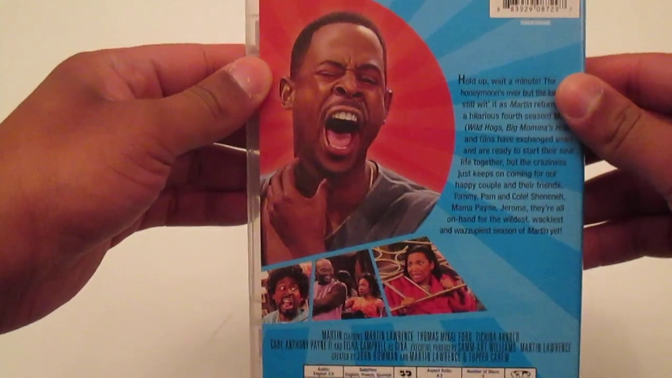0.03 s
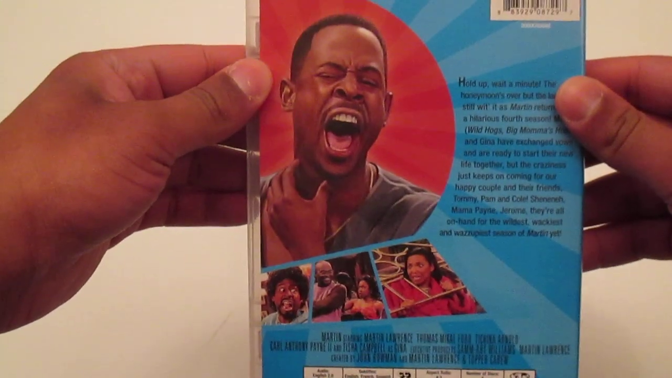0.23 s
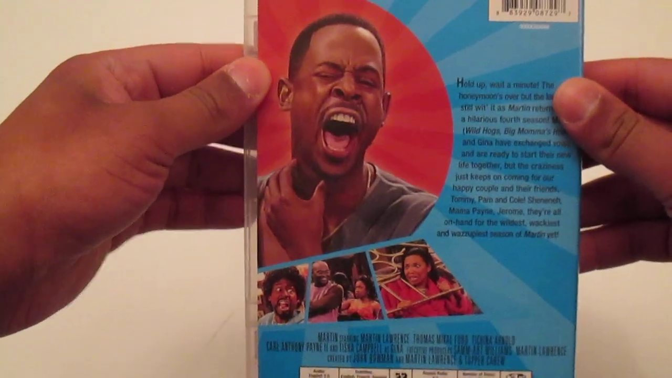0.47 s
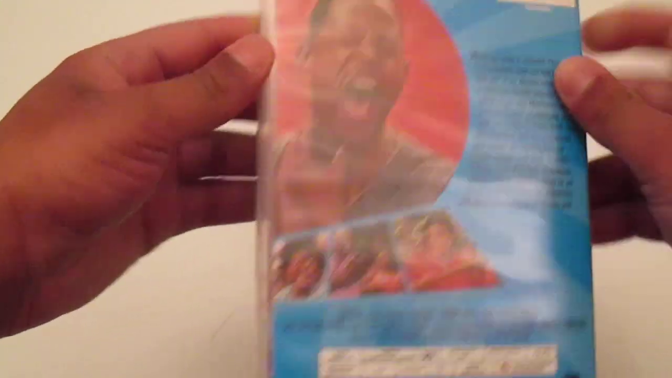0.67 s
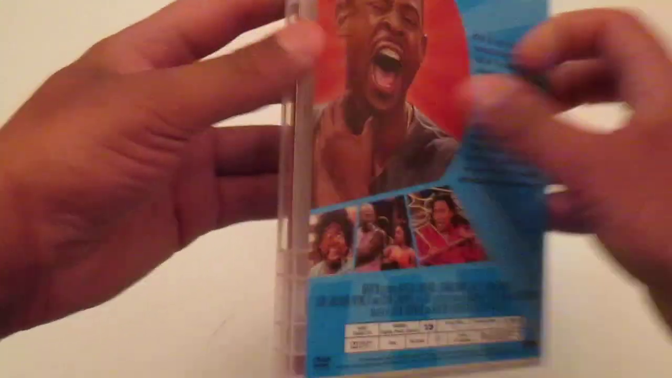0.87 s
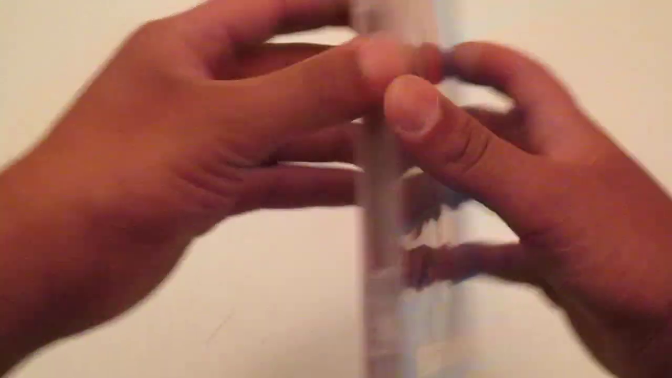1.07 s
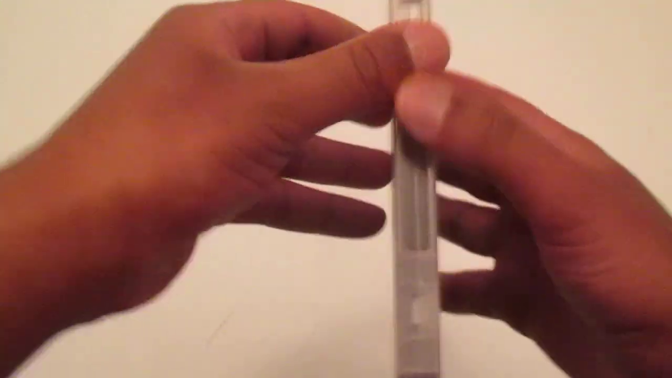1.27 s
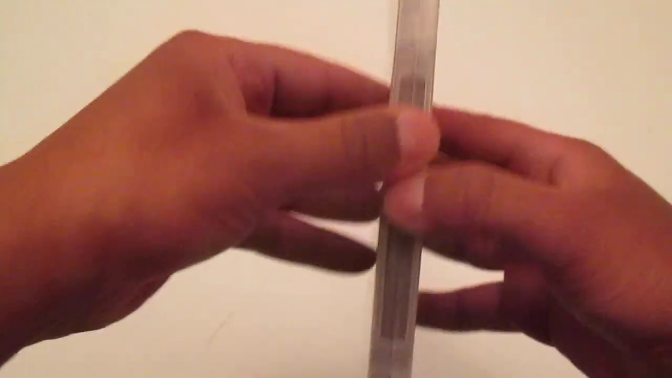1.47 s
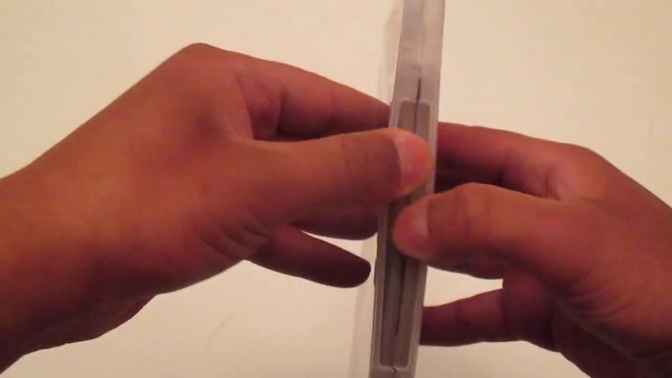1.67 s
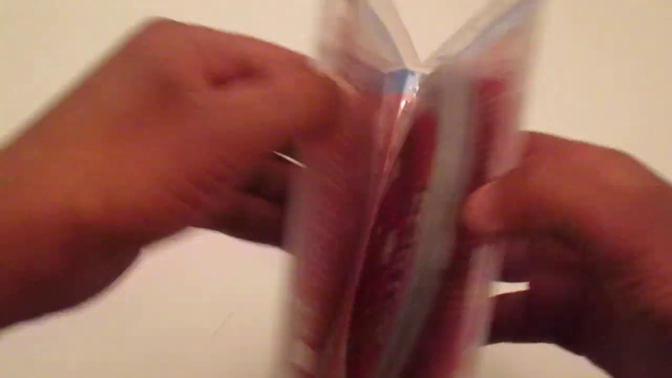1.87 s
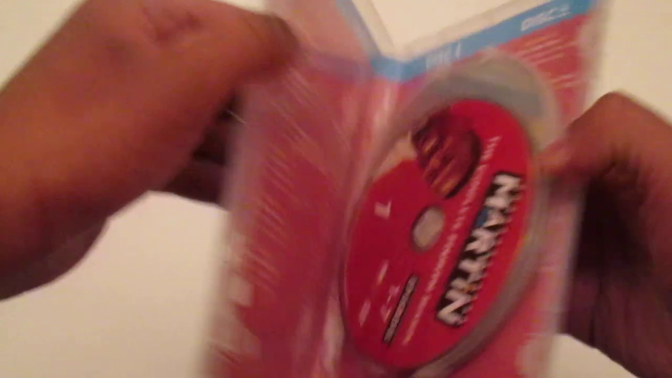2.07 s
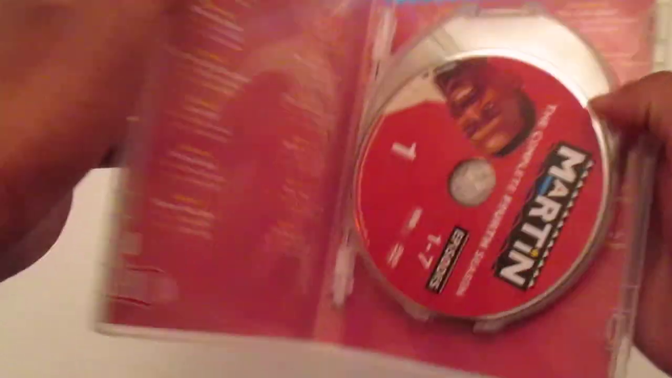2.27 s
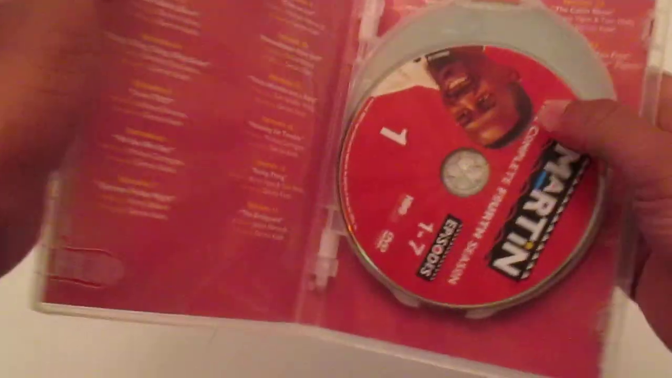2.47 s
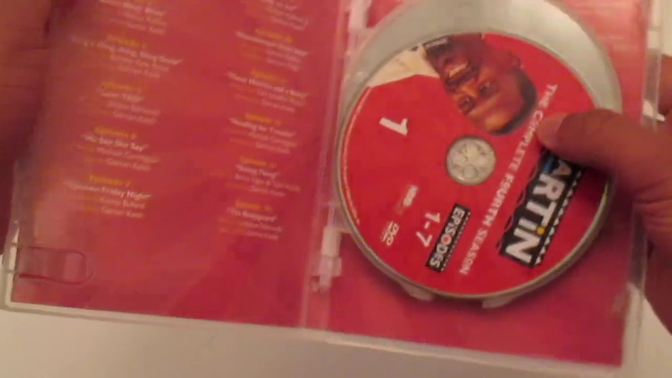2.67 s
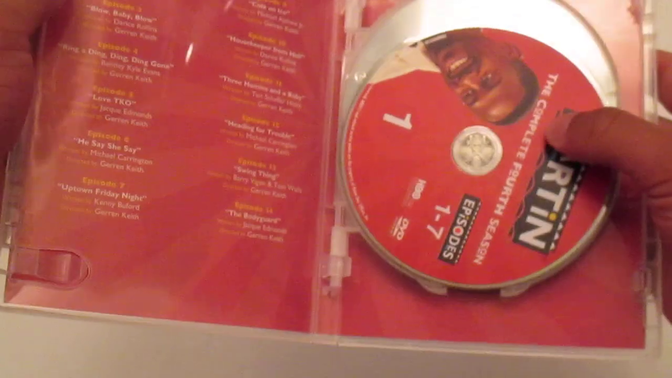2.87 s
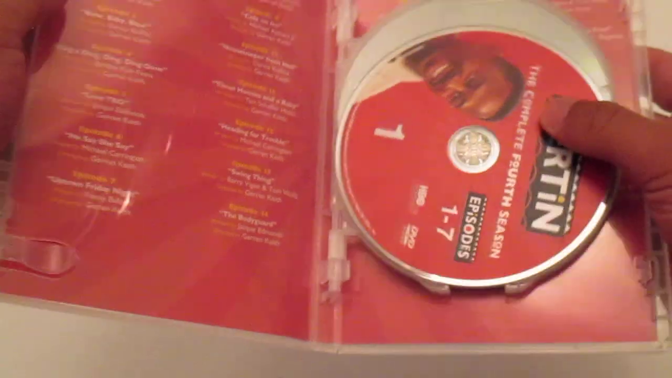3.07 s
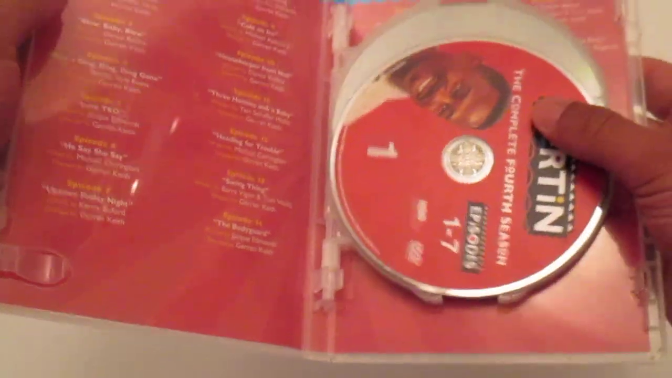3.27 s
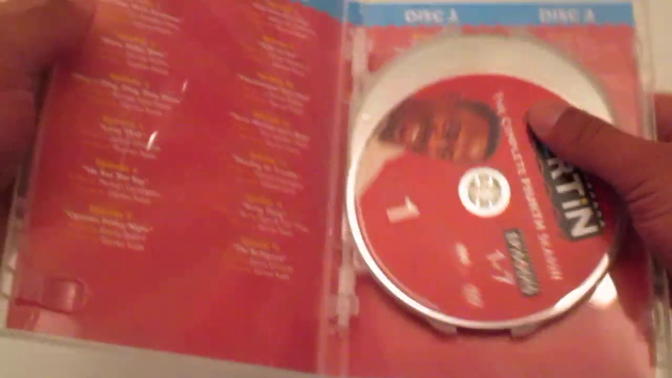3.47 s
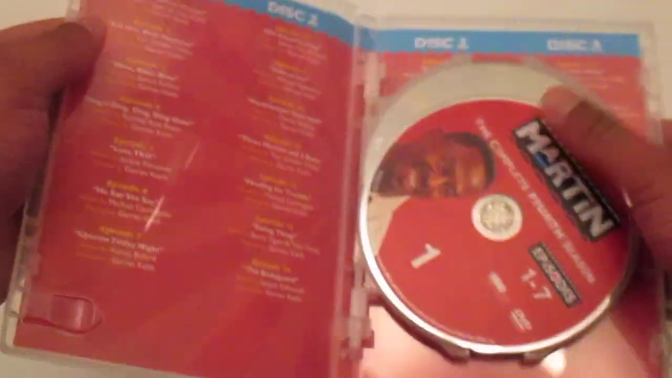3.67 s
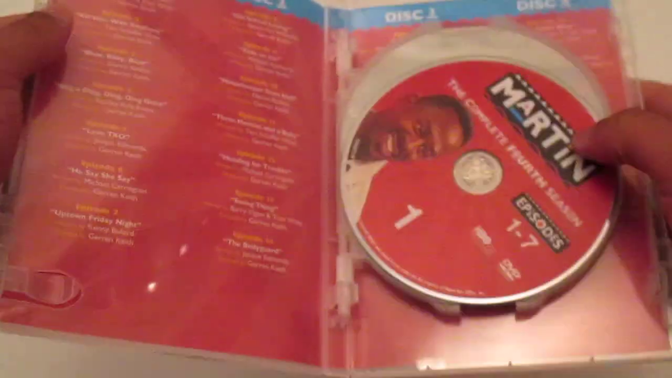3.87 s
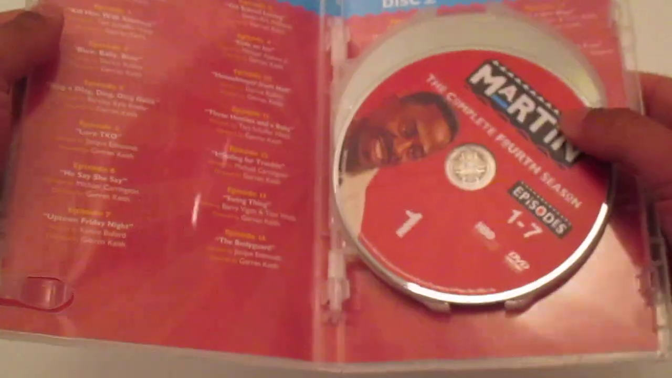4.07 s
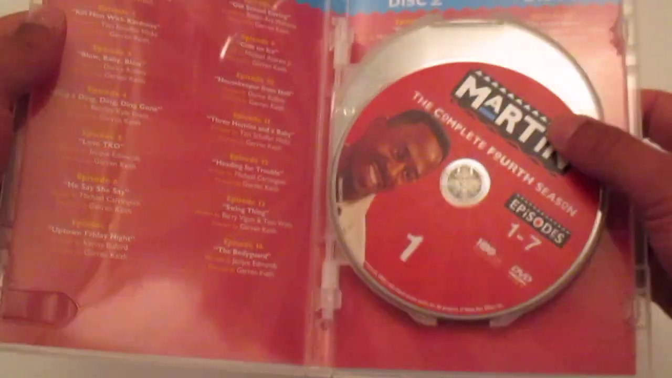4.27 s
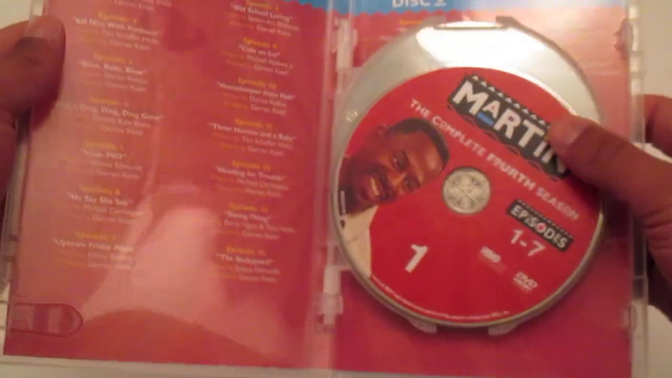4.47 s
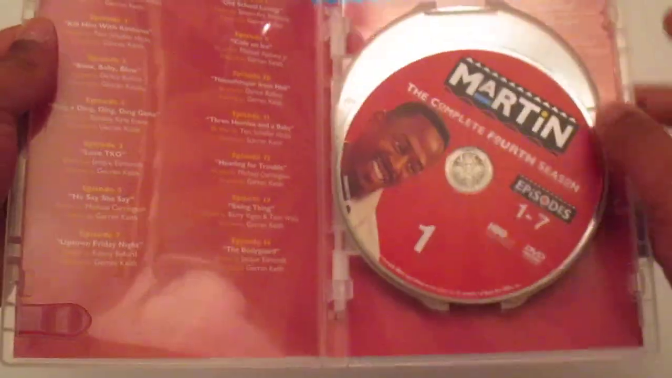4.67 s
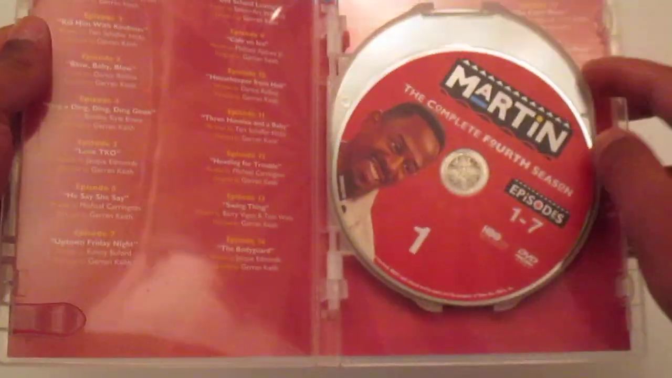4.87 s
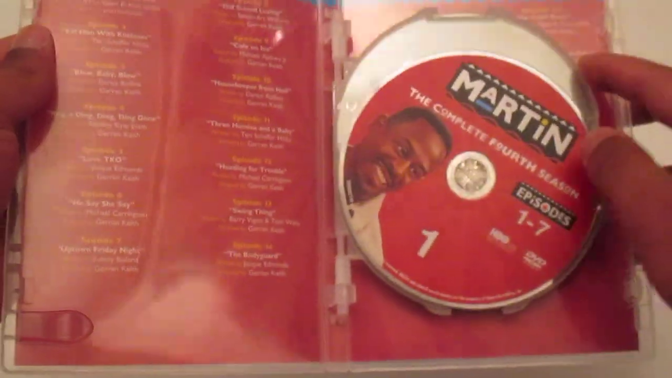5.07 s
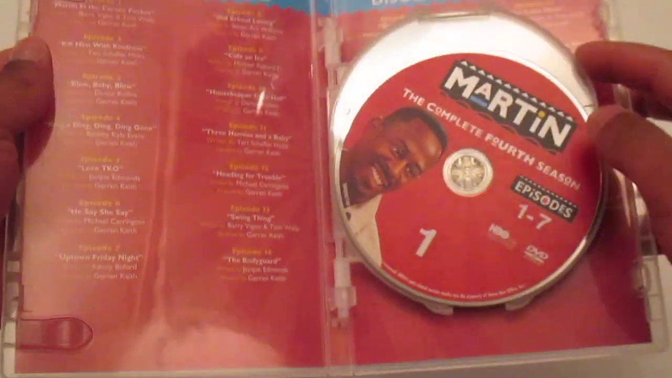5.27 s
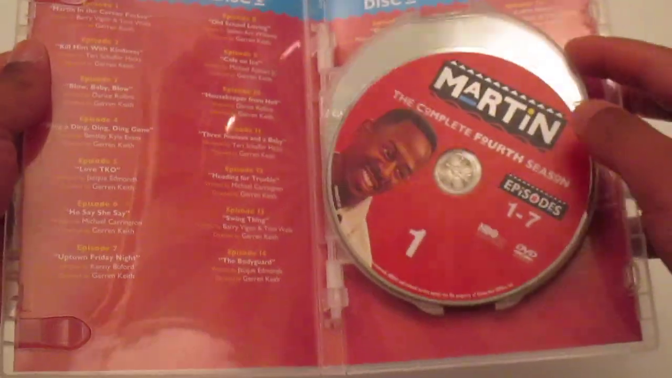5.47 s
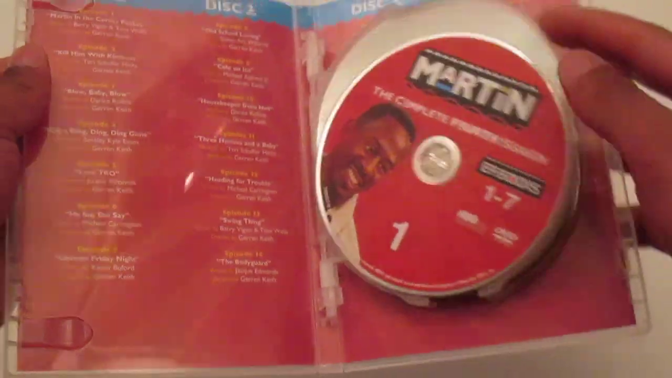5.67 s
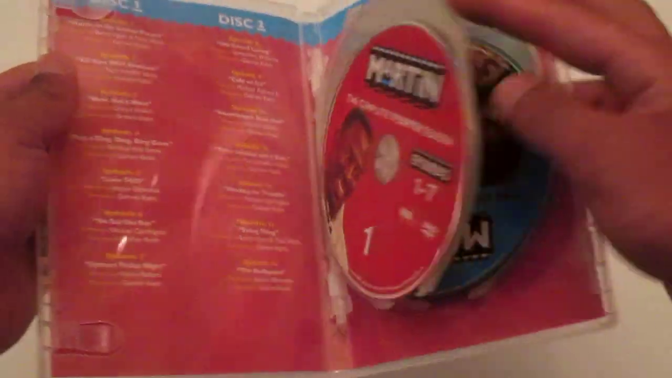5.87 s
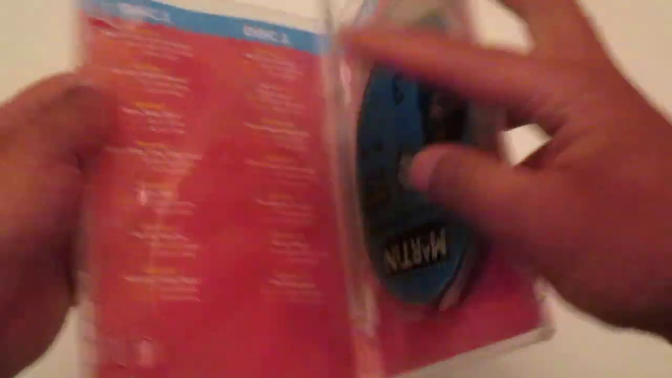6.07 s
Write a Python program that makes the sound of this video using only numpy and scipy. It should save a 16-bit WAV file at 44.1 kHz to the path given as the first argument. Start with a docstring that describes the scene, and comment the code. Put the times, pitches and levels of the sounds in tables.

```python
"""A small room with a humming fan: a plastic disc case is handled close to the microphone.
Fingers tap and rub the shell, two latches snap open and the hinge cracks: blows and slips that ring plastic modes.
A thumb pushes the disc round on its hub with a stick-slip hiss; the inner tray pops free, scrapes and clacks.
The room adds near reflections and a short tail; loud snaps duck the recorder's gain and overload it."""
import sys
import numpy as np
from scipy import signal
from scipy.fft import rfft, irfft
from scipy.io import wavfile

SR = 44100
rng = np.random.default_rng(int(sys.argv[2]) if len(sys.argv) > 2 else 0)


def store_wav(level_fs):
    """Save 16-bit WAV to argv[1]."""
    pcm = np.round(np.clip(np.atleast_2d(level_fs), -1, 1) * 32767)
    wavfile.write(sys.argv[1], SR, pcm.T.astype(np.int16))


N = 270774
TIME = np.arange(N) / SR   # seconds

# Spectrum of the room air around the microphone. Each row: frequency in Hz, relative density in dB per Hz.
AIR_SPECTRUM = [(20, -1), (50, -1.5), (75, -6), (120, -2.5), (190, -10.5), (300, -9), (500, -13.5),
                (850, -14.5), (1600, -20), (3200, -24.5), (5000, -29), (8000, -34), (11000, -42),
                (16000, -46)]
AIR_DB = -54.5
# Hum of the fan in the room. Each row: frequency in Hz, relative level in dB.
FAN_HUM = [(52.5, -57.5), (102.3, -60.5), (156.1, -66)]
# Swells of the fan's motor tone. Each row: start in seconds, length in seconds, level in dB.
MOTOR_SWELLS = [(3.1, 0.96, -64), (5.15, 0.55, -66.5)]
MOTOR_HZ, MOTOR_DB = 232, -65.5
SWELL_ATTACK_S, SWELL_RELEASE_DB_PER_S = 0.43, 72
# A thin electronic whine with a trembling pitch, and a faint whistle that comes and goes.
WHINE_HZ, WHINE_DB = 11800, -80.5
WHISTLE_HZ, WHISTLE_MEDIAN_DB = 4800, -82.5

# Rumble of the shell under the moving hands.
RUMBLE_START_S, RUMBLE_ATTACK_S, RUMBLE_DB, RUMBLE_TOP_HZ = .4, .8, -60.5, 166

# Fingertips and nails knocking on the shell.
# Each row: start in seconds, relative level in dB, tilt in dB per octave, boom in dB, contact corner in Hz.
FINGER_TAPS = [(0.582, -59.5, 5.5, 1, 14000), (0.607, -51, -.5, 6, 7500), (0.644, -48.5, 3, 9, 14000),
               (0.653, -37, 0.6, -3.5, 5600), (0.789, -47, -2, 2, 14000), (0.852, -39.5, 2.5, -3, 3900),
               (0.96, -47, 5.5, -13, 6030), (1.006, -44.5, 1, 4, 7500), (1.062, -51.5, -0.5, 3.5, 5000),
               (1.09, -41, 2.5, 2, 6500), (1.175, -46.5, -1.5, 1, 7000), (1.216, -47, -0.5, 4.5, 6000),
               (1.316, -45, 0.5, 6, 5800), (2.233, -53.5, -1.5, 0, 4010), (2.424, -52.5, 0, -6, 4000),
               (3.879, -47.5, 0.5, -8, 3600), (4.465, -41.5, -3.5, -9, 3000), (4.533, -48.5, 0, -7, 4500),
               (5.65, -54, -1, 1, 3500), (5.787, -54.5, -4.5, -2, 4000), (5.92, -49.5, -1.5, -4, 4000),
               (6.021, -55, -0.5, 2, 4000), (6.073, -54.5, -3, 6.5, 6000)]
# Damped bending modes of the shell. Each row: frequency in Hz, width in Hz, relative level in dB.
SHELL_MODES = [(194, 170, -5.5), (338, 98, -3), (690, 260, -4), (1087, 160, -2.5), (1550, 180, -5),
               (1940, 220, -7), (2633, 540, -6.5), (3200, 670, -6), (4467, 550, -2), (5250, 1200, -7.5),
               (6867, 550, -6), (7455, 1800, -6.5), (8807, 400, -14), (12620, 900, -21), (13600, 1600, -22)]
# Every blow tilts the modes about PIVOT_HZ; one that meets a panel squarely adds boom around BOOM_HZ.
PIVOT_HZ, BOOM_HZ, BOOM_OCTAVES = 2440, 1050, .6

# Skin sliding over the plastic sleeve. Each row: start in seconds, length in seconds, level in dB before sag.
SKIN_RUBS = [(.7, .8, -56.5), (2.197, 0.55, -62.5), (5.846, .22, -57)]
RUB_ATTACK_S, RUB_SAG_DB_PER_S, RUB_RELEASE_DB_PER_S = 0.22, 8, 109
# Resonances of the sleeve. Each row: frequency in Hz, width in Hz, relative level in dB.
SLEEVE_MODES = [(785, 180, 1.5), (1080, 260, 2.5), (1750, 600, -3), (2500, 1400, -6.5), (4197, 1700, -7.5),
                (7000, 1900, -10.5)]

# Short swelling slips of skin or plastic on the shell.
# Each row: time of the peak in seconds, relative level in dB, half-length in seconds, centre in Hz.
SHELL_SCUFFS = [(0.841, -53, 0.027, 3300), (0.894, -48.5, 0.0096, 1700), (1.115, -45.5, 0.015, 950),
                (1.132, -44.5, 0.011, 1740), (1.286, -59, 0.0077, 7500), (1.501, -43, 0.009, 3320),
                (1.9715, -25, 0.0036, 3356), (2.136, -47, 0.012, 423), (3.519, -42, 0.0099, 6960),
                (6.06, -49, 0.008, 2880)]

# Latches and hinge letting go. Each row: start in seconds, relative level in dB, tilt in dB per octave,
# boom in dB, the catch's own ring in Hz, relative level of that ring in dB.
LATCH_SNAPS = [(1.7793, -14, -0.45, -3, 3150, -10), (1.8032, -15, -0.1, 5.5, 3150, -13),
               (1.9533, -29, 2.5, -0.5, 4220, -21.5), (1.974, -38.5, 4.5, 2, 3540, -37),
               (2.0464, -40, 2.5, -2, 2300, -40.5), (2.121, -38.5, 0.7, -3, 4500, -35.5),
               (2.144, -50, -3, -11, 2680, -53)]
# Lingering modes of the lid. Each row: frequency in Hz, width in Hz, relative level in dB.
LID_MODES = [(355, 14, -24), (1130, 13, -18), (1200, 20, -17)]
# A snap bounces once between the two halves of the case.
BOUNCE_S, BOUNCE_DB = .00092, -13

# The thumb pushing the disc round against the tray. Each row: start in seconds, length in seconds,
# attack in seconds, relative level in dB, treble share in dB.
DISC_PUSHES = [(2.95, 0.075, 0.027, -58, -8.5), (3.043, 0.037, 0.037, -43, -11),
               (3.2, 0.071, 0.077, -39.5, -20.5), (3.283, 0.122, 0.024, -46.5, -8),
               (3.414, .14, 0.0043, -42.5, -4), (3.932, 0.097, 0.033, -54, -7),
               (4.035, .11, .06, -46.5, -8), (4.152, 0.054, .02, -53, -11), (4.265, 0.066, .04, -58, -9)]
PUSH_RELEASE_DB_PER_S = 484
# Resonances of the disc. Each row: frequency in Hz, width in Hz, relative level in dB.
DISC_MODES = [(1000, 190, -2.5), (1925, 210, 4.5), (2954, 420, 3.5), (3565, 300, 4.5), (4170, 610, -1.5),
              (4720, 350, -2), (5600, 740, -8.5), (6770, 400, -2.5), (7150, 650, -5.5)]

# The tray popping free: time, relative level.
POP_S, POP_DB = 4.6440, -18
# Flexing modes of the tray. Each row: frequency in Hz, width in Hz, relative level in dB.
TRAY_MODES = [(99.4, 21, 1), (238, 38, -2), (317.6, 7.1, -7), (480, 56, -4), (630, 64, -6), (826, 88, -8),
              (1480, 380, -11.5), (2390, 120, -11.5), (4900, 500, -43)]
# From the pop on, the tray's edge drags along the shell, sagging in level, then stops quickly.
DRAG_S, DRAG_DB, DRAG_ATTACK_S = .16, -33, 0.011
DRAG_SAG_DB_PER_S, DRAG_RELEASE_DB_PER_S = 40.5, 350
# Resonances of the tray's edge. Each row: frequency in Hz, width in Hz, relative level in dB.
EDGE_MODES = [(314, 54, -0.5), (565, 230, -12), (1040, 150, -7), (1550, 280, -9), (1890, 410, -12),
              (2400, 370, -10), (3080, 1400, -16), (4150, 550, -13), (4960, 480, -17), (6830, 2400, -26.5),
              (13000, 4000, -43.5)]

# The tray clacking against hinge and shell.
# Each row: start in seconds, relative level in dB, tilt in dB per octave, boom in dB, contact corner in Hz.
TRAY_CLACKS = [(4.7906, -39, 3, -7, 9000), (4.8004, -40, 1.5, 6.5, 5400), (4.8692, -41, 2, -7, 4000),
               (5.9454, -27.5, 0.95, 3, 15000)]
# Modes of the tray's rim. Each row: frequency in Hz, width in Hz, relative level in dB.
RIM_MODES = [(184, 78, 4), (362, 52, -8), (590, 280, -17), (1090, 260, 2.5), (1600, 57, -18),
             (2150, 520, -11), (2890, 480, -1), (3660, 130, -11), (4305, 320, -6.5), (4830, 400, -6.5),
             (5930, 520, -5.5), (7230, 310, -13), (8860, 770, -19.5)]

# Near reflections from table and wall. Each row: delay in seconds, level in dB.
NEAR_ECHOES = [(.0049, -20), (0.012, -24), (0.0162, -23.5)]
# Diffuse tail of the small room. Each row: band centre in Hz, 60 dB decay time in seconds, level in dB.
ROOM_BANDS = [(198.1, 0.27, -13), (450, 0.3, -13), (1110, 0.35, -17), (2090, 0.16, -12), (4422, .29, -19.5),
              (9000, 0.16, -15)]

CUTOFF_HZ = 15850   # top of the recorder's range


def from_db(db):
    """Decibels to gain."""
    return 10 ** (np.asarray(db) / 20)


def rms_one(x):
    """Scale to unit power."""
    return x / np.sqrt(np.mean(x ** 2) + 1e-20)


def cut(x, hz, kind, order=2):
    """Butterworth low- or high-pass."""
    sections = signal.butter(order, np.clip(hz, 10, .45 * SR), kind, fs=SR, output="sos")
    return signal.sosfilt(sections, x)


def drift(rate):
    """Slow chance: random points of unit spread, `rate` per second, joined by straight lines."""
    knots = rng.standard_normal(N // 20)
    return np.interp(TIME * rate, np.arange(len(knots)), knots)


def tone(hz, wander_hz, rate):
    """A sine of unit power whose pitch wanders."""
    pitch_hz = hz + wander_hz * drift(rate)
    return np.sqrt(2) * np.sin(2 * np.pi * np.cumsum(pitch_hz) / SR)


def resonance(x, hz, width):
    """Two-pole resonance with a peak gain of 1."""
    r = np.exp(-np.pi * width / SR)
    poles = [1, -2 * r * np.cos(2 * np.pi * hz / SR), r * r]
    return signal.lfilter((1 - r * r) / 2 * np.array([1, 0, -1]), poles, x + 1e-18)


def add(out, s, sound):
    """Mix a short sound in at time s."""
    at = int(s * SR)
    out[at:at + len(sound)] += sound[:N - at]


def stroke(start_s, length_s, attack_s, release_db_per_s, sag_db_per_s=0):
    """A movement gathers speed, holds or slowly sags, then dies away; gain in time."""
    t = np.maximum(TIME - start_s, 0)
    rise = np.sin(np.pi / 2 * np.minimum(t / attack_s, 1))
    loss_db = sag_db_per_s * t + release_db_per_s * np.maximum(t - length_s, 0)
    return rise * from_db(-np.clip(loss_db, 0, 200))


def strike(modes, tilt_db, boom_db, crackle, crackle_s, bend, corner_hz=SR / 2, size=16384):
    """A release and a brief, bright crackle of micro-slips ring the modes; in a thin plate the highs arrive first."""
    t = np.arange(size) / SR
    slips = cut(rng.standard_normal(size) * np.exp(-t / crackle_s), 1400, "high")
    force = crackle * rms_one(slips) / np.sqrt(size)
    force[0] += 1   # the release itself
    out = np.zeros(size)
    for k, (hz, width, db) in enumerate(modes):
        boom_shape = np.exp(-.5 * (np.log2(hz / BOOM_HZ) / BOOM_OCTAVES) ** 2)
        colour_db = tilt_db * np.log2(hz / PIVOT_HZ) + boom_db * boom_shape
        out += (-1) ** k * from_db(db + colour_db) * rms_one(resonance(force, hz, width))
    out = cut(out, corner_hz, "low")   # a soft contact lasts longer and dulls the top
    for _ in range(5):   # all-passes that delay the lows
        out = signal.lfilter([-bend, 1], [1, -bend], out)
    return out * np.sqrt(.004 / t[-1])   # levels refer to the energy packed into 4 ms


def friction(modes, per_s, grain_db, uneven_db):
    """Dense stick-slip grains of uneven size ringing the modes; unit power."""
    happens = rng.random(N) < per_s / SR
    size_db = grain_db * np.minimum(rng.exponential(1, N), 4)
    slips = happens * rng.standard_normal(N) * from_db(size_db)
    slips = slips * from_db(uneven_db * drift(130))
    out = np.zeros(N)
    for k, (hz, width, db) in enumerate(modes):
        out += (-1) ** k * from_db(db) * resonance(slips, hz, width)
    return rms_one(out)


def background():
    """Room air as shaped noise, a wavering fan hum with its motor tone, and thin high tones."""
    hz, db = np.transpose(AIR_SPECTRUM)
    bins = np.maximum(np.fft.rfftfreq(N, 1 / SR), 1)
    spectrum_db = np.interp(np.log(bins), np.log(hz), db)
    air = rms_one(irfft(rfft(rng.standard_normal(N)) * from_db(spectrum_db), N))
    hum = sum(from_db(db + 2.2 * drift(4.4)) * tone(hz, wander_hz=1.7, rate=15) for hz, db in FAN_HUM)
    swells = np.zeros(N)
    for s, length_s, db in MOTOR_SWELLS:
        swells += from_db(db) * stroke(s, length_s, SWELL_ATTACK_S, SWELL_RELEASE_DB_PER_S)
    motor = (from_db(MOTOR_DB) + swells) * tone(MOTOR_HZ, wander_hz=2.0, rate=4)
    tremble_hz = 26 * np.sin(2 * np.pi * 30 * TIME)
    whine = from_db(WHINE_DB) * tone(WHINE_HZ + tremble_hz, wander_hz=14, rate=150)
    whistle = from_db(WHISTLE_MEDIAN_DB + 5 * drift(18)) * tone(WHISTLE_HZ, wander_hz=30, rate=90)
    return from_db(AIR_DB) * air + from_db(-1.0) * hum + motor + whine + whistle


def hands():
    """Moving hands make the shell rumble: low noise that fades in and stays."""
    moving = np.clip((TIME - RUMBLE_START_S) / RUMBLE_ATTACK_S, 0, 1)
    low_noise = cut(rng.standard_normal(N), RUMBLE_TOP_HZ, "low", order=4)
    return from_db(RUMBLE_DB) * moving * rms_one(cut(low_noise, 37, "high"))


def taps():
    """Fingers knock on the shell and land less cleanly than a snap, with a stronger crackle."""
    out = np.zeros(N)
    for s, db, tilt_db, boom_db, corner_hz in FINGER_TAPS:
        knock = strike(SHELL_MODES, tilt_db, boom_db, crackle=1.77, crackle_s=0.0031, bend=.6,
                       corner_hz=corner_hz)
        add(out, s, from_db(db) * knock)
    return from_db(-0.84) * cut(out, 296, "high")


def fingers():
    """Skin rustles over the plastic sleeve: stick-slip friction under slow strokes."""
    rustle = cut(friction(SLEEVE_MODES, per_s=2800, grain_db=2.0, uneven_db=4.0), 6700, "low")
    rubbing = np.zeros(N)
    for s, length_s, db in SKIN_RUBS:
        rubbing += from_db(db) * stroke(s, length_s, RUB_ATTACK_S, RUB_RELEASE_DB_PER_S, RUB_SAG_DB_PER_S)
    return rustle * rubbing


def scuffs():
    """Each slip swells and fades, in the band that the size of its contact favours."""
    grit = friction(SLEEVE_MODES, per_s=4000, grain_db=1.5, uneven_db=1.5)
    out = np.zeros(N)
    for s, db, half_s, hz in SHELL_SCUFFS:
        swell = np.exp(-np.minimum(((TIME - s) / half_s) ** 2 / 2, 30))
        out += from_db(db) * swell * rms_one(resonance(grit, hz, 0.45 * hz))
    return from_db(-1.5) * out


def snaps():
    """Each catch lets go at once, rings by itself and shakes shell and lid; dulled around and above 10 kHz."""
    out = np.zeros(N)
    for s, db, tilt_db, boom_db, catch_hz, catch_db in LATCH_SNAPS:
        case_ring = strike(SHELL_MODES + LID_MODES, tilt_db, boom_db, crackle=0.53, crackle_s=.003, bend=.65)
        add(out, s, from_db(db) * case_ring)
        catch_ring = strike([(catch_hz, 620, catch_db)], 0, 0, crackle=0.15, crackle_s=0.0035, bend=.6)
        add(out, s + .0004, catch_ring)
    out = out + from_db(BOUNCE_DB) * np.interp(TIME - BOUNCE_S, TIME, out)
    notched = out - from_db(-1.0) * resonance(out, 10300, 3400)
    return from_db(1.0) * cut(notched, 9800, "low")


def disc():
    """The disc hisses against the tray by stick-slip; each push has its own treble, and the louder push prevails."""
    hiss = cut(friction(DISC_MODES, per_s=9000, grain_db=1.8, uneven_db=1.5), 1100, "high")
    hiss = cut(hiss, 9300, "low", order=4)
    body = rms_one(cut(hiss, 4670, "low", order=4))
    treble = rms_one(cut(hiss, 4600, "high", order=4))
    body_gain = treble_gain = 0
    for s, length_s, attack_s, db, treble_db in DISC_PUSHES:
        push = from_db(db) * stroke(s, length_s, attack_s, PUSH_RELEASE_DB_PER_S)
        body_gain = np.maximum(body_gain, push)
        treble_gain = np.maximum(treble_gain, from_db(treble_db) * push)
    return from_db(-3.0) * (body_gain * body + treble_gain * treble)


def tray():
    """The tray pops free with a dull thump of its flexing modes, then its edge scrapes along the shell."""
    pop = np.zeros(N)
    add(pop, POP_S, from_db(POP_DB) * strike(TRAY_MODES, 0, 0, crackle=0.075, crackle_s=.004, bend=0.42))
    drag = stroke(POP_S, DRAG_S, DRAG_ATTACK_S, DRAG_RELEASE_DB_PER_S, DRAG_SAG_DB_PER_S)
    scrape = drag * friction(EDGE_MODES, per_s=3000, grain_db=1.5, uneven_db=0.8)
    return cut(pop, 5500, "low") + from_db(DRAG_DB) * scrape


def clacks():
    """The swinging tray knocks against its stops, and each blow rings the modes of its rim."""
    out = np.zeros(N)
    for s, db, tilt_db, boom_db, corner_hz in TRAY_CLACKS:
        knock = strike(RIM_MODES, tilt_db, boom_db, crackle=0.73, crackle_s=0.0021, bend=0.57,
                       corner_hz=corner_hz)
        add(out, s, from_db(db) * knock)
    return from_db(-3.5) * cut(out, 10000, "low")


def room(x, build_s, size=24000):
    """A few near reflections, and a diffuse tail that builds up and dies by band."""
    t = np.arange(size) / SR
    response = np.zeros(size)
    for hz, t60, db in ROOM_BANDS:
        band = cut(rng.standard_normal(size), hz / np.sqrt(2), "high", order=4)
        band = cut(band, hz * np.sqrt(2), "low", order=4)
        decay = from_db(-60 * t / t60) * (1 - np.exp(-t / build_s))
        response += from_db(db) * band * rms_one(decay) / np.sqrt(size)
    for delay, db in NEAR_ECHOES:
        response[int(delay * SR)] += from_db(db)
    return signal.fftconvolve(x, response)[:N]


def scene():
    """The case close to the microphone, its room and the background."""
    case = hands() + taps() + fingers() + scuffs() + snaps() + disc() + tray() + clacks()
    return (case + room(case, build_s=.005) + background())[None]


def gain_control(x, threshold_db, depth_db, release_db_per_s, attack_s):
    """Peaks over the threshold pull the gain down; it creeps back up."""
    over = np.clip(20 * np.log10(np.abs(x) + 1e-9) - threshold_db, 0, depth_db)
    recovery = release_db_per_s * TIME
    held = np.maximum.accumulate(over + recovery, axis=-1) - recovery
    r = np.exp(-1 / (attack_s * SR))
    reduction_db = signal.lfilter([1 - r], [1, -r], held)
    return x * from_db(-reduction_db)


def record(dry):
    """The recorder: gain control, rounded overload near full scale, and the top cut off."""
    ducked = gain_control(dry, threshold_db=-4.0, depth_db=9.5, release_db_per_s=5.5, attack_s=0.051)
    clipped = ducked / (1 + ducked ** 16) ** (1 / 16)
    top_cut = signal.ellip(10, .1, 80, CUTOFF_HZ, fs=SR, output="sos")
    return signal.sosfilt(top_cut, clipped)


dry = scene()
out = record(dry)
store_wav(out)
```